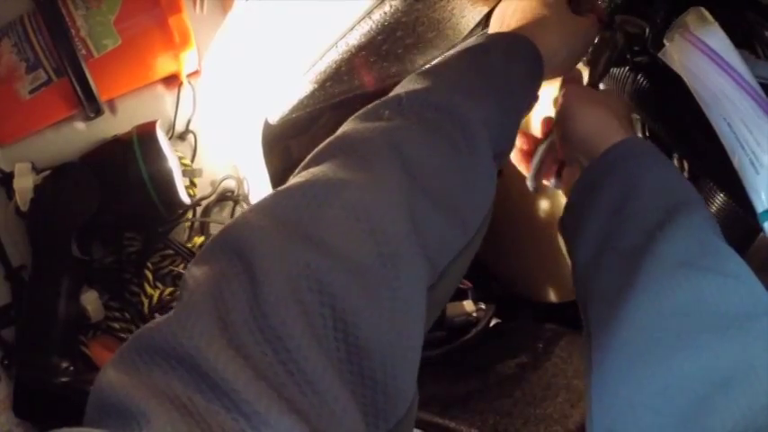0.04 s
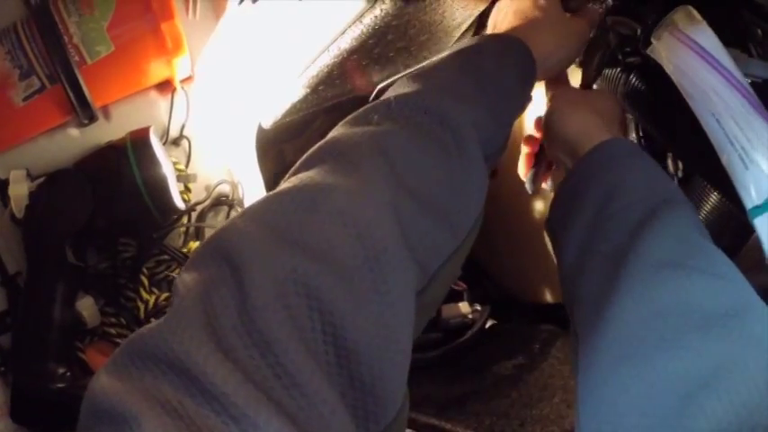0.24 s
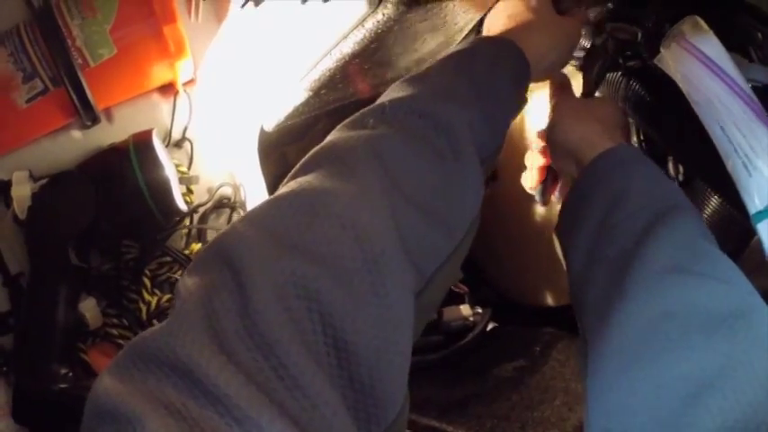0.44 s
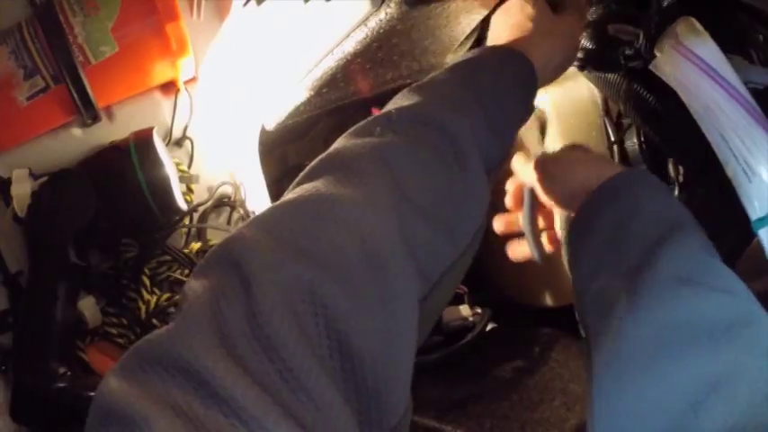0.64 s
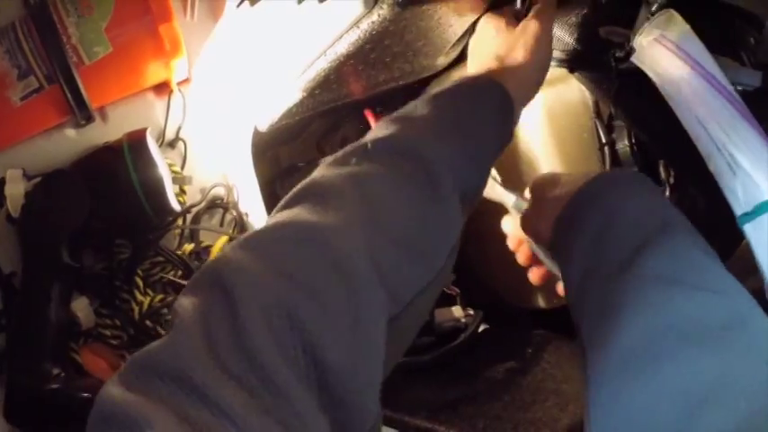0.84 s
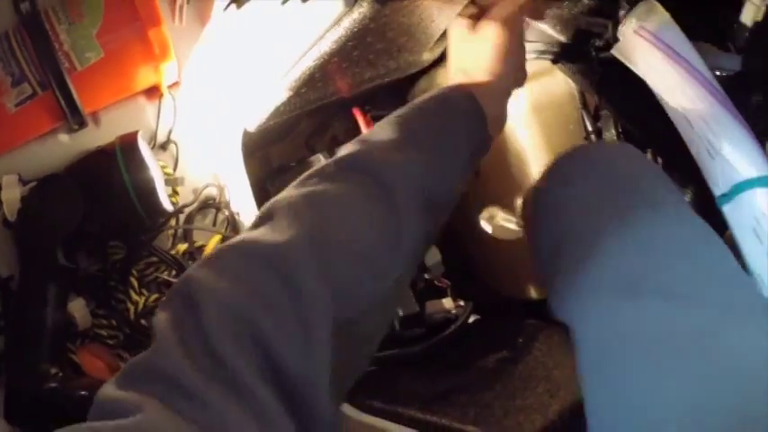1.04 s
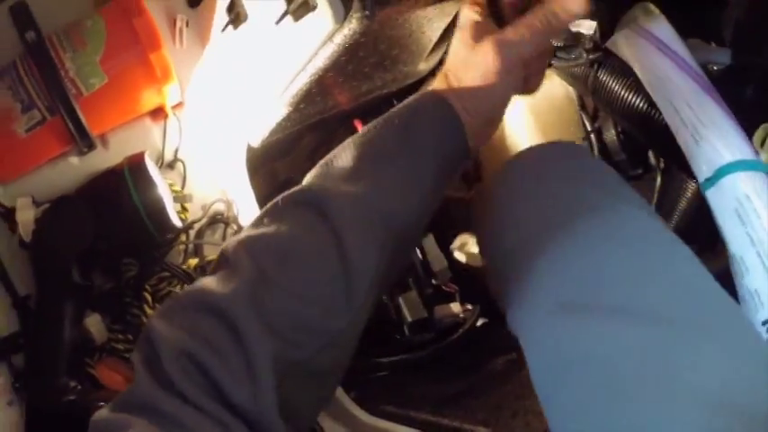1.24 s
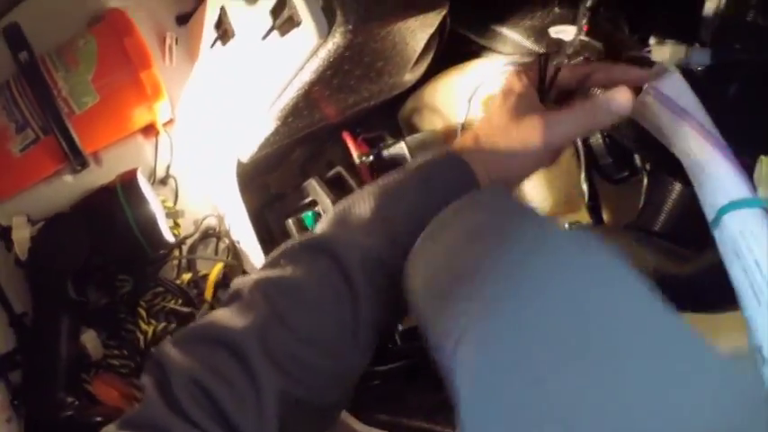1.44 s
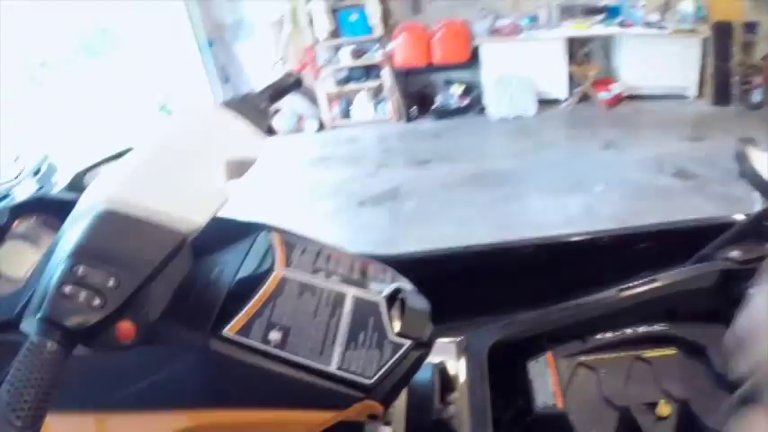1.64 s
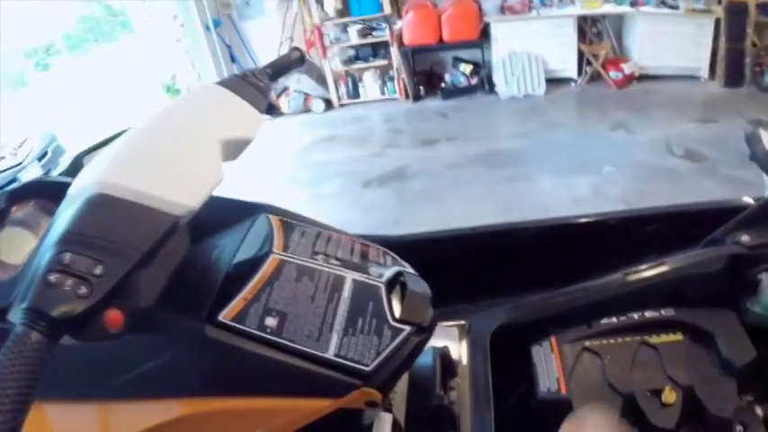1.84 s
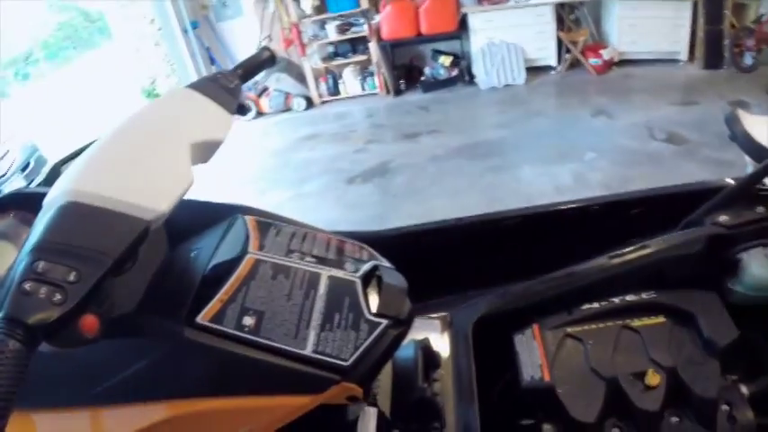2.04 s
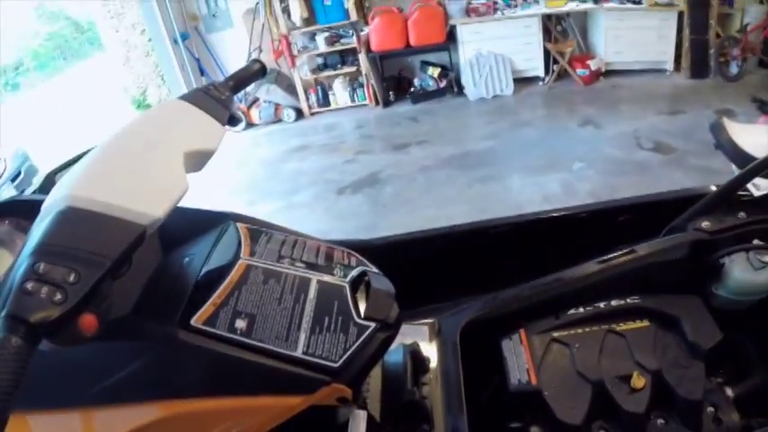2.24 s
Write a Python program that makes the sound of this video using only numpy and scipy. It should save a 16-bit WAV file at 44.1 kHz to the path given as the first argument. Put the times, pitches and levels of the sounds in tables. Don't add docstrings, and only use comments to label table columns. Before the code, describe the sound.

A single sharp snip of cutters through a plastic cable tie, over soft hiss and low rumble

```python
import sys
import numpy as np
from scipy import signal
from scipy.fft import rfft, irfft
from scipy.io import wavfile
from scipy.ndimage import uniform_filter1d

SR = 44100
rng = np.random.default_rng(int(sys.argv[2]) if len(sys.argv) > 2 else 0)


def store_pcm(level_fs):
    pcm = np.round(np.clip(level_fs, -1, 1) * 32767).astype(np.int16)
    wavfile.write(sys.argv[1], SR, np.atleast_2d(pcm).T)


def volts_from_db(level):
    exponent = np.asarray(level, float) / 20
    return 10 ** exponent


N = 101121

# (time [s], level [dB])
SNAP_EVENTS = [
    (0.4641, -10),
    (.4648, -5.5),
    (.4656, -11),
    (.4662, -12.5),
    (0.4672, -6),
    (.4689, -19),
    (.4706, -18.5),
    (.4731, -24.5),
    (.4785, -33.5),
]
# (frequency [Hz], level [dB], T60 [s])
BODY_MODES = [(1170, -10, .03), (1642, -24.5, 0.038), (2010, -8.5, .03), (2152, -13.5, .022),
              (2440, -14.5, .022), (2600, -7, 0.01), (3437, -8.5, .016), (3590, -12.5, 0.02),
              (4627, 0, 0.011), (4920, -4, 0.012), (5280, -9, 0.012), (6720, -4, 0.014), (7500, -6.5, .014),
              (8430, -6, 0.0074)]
# (frequency [Hz], density [dB per Hz])
CRACK_SPECTRUM = [(1400, -20.5), (2200, -6.5), (3000, -12), (4700, -12.5), (5800, -7.5), (7500, 1),
                  (10000, -7), (15500, -30)]
# (frequency [Hz], density [dB per Hz])
TAIL_SPECTRUM = [(1400, -13.5), (2060, -0.5), (3000, -8), (4500, -11), (6800, -4), (8500, -10.5),
                 (11000, -25), (15000, -39.5)]
# (time [s], level [dB], frequency [Hz], T60 [s])
THUMP_EVENTS = [
    (.4765, -19, 55, .14),
    (.878, -26, 55, .14),
    (1.318, -26, 55, .08),
    (1.597, -26, 30, .14),
]
# (time [s], level [dB], frequency [Hz], T60 [s])
TICK_EVENTS = [
    (.4254, -42, 4900, .025),
    (.8814, -49, 2300, .03),
    (1.058, -48, 3000, .07),
    (1.122, -46, 2800, .06),
    (1.123, -48, 5200, .05),
    (1.2476, -37, 4800, .02),
    (1.248, -40, 4200, .025),
    (1.2485, -39, 3200, .035),
    (1.252, -45, 2500, .04),
]
# (start [s], length [s], level [dB], frequency [Hz], relative width [1])
BRUSH_EVENTS = [
    (.16, .06, -59, 1400, .4),
    (1.13, .1, -54, 3450, .14),
    (1.14, .08, -58, 1800, .25),
    (1.14, .09, -58, 5200, .6),
    (1.59, .042, -51, 2800, .14),
    (1.582, .04, -55, 4600, .12),
    (1.585, .055, -56, 3600, .9),
    (1.0, .1, -71, 10500, .06),
    (1.12, .14, -71, 10500, .06),
    (1.585, .07, -71, 10500, .06),
]
# (frequency [Hz], density [dB per Hz])
HISS_SPECTRUM = [(53, -29.5), (90, -6.5), (213, -4.5), (294, -8.5), (443, -10), (515, -12.5), (2710, -18.5),
                 (13300, -39), (15500, -49.5)]
# (frequency [Hz], density [dB per Hz])
RUMBLE_SPECTRUM = [(7.1, -14), (12, 5.5), (31, -5.5), (70, -10.5), (97, -20.5), (160, -36), (210, -64),
                   (350, -120)]
# (time [s], level [dB])
GUST_LEVEL = [(0, -39), (.1, -43), (.3, -42), (.45, -43.5), (.52, -56), (.59, -42), (.74, -45.5),
              (.85, -50), (.92, -39.5), (.97, -36.5), (1.05, -40), (1.3, -36), (1.48, -38), (1.682, -37.5),
              (1.7, -48), (1.93, -48), (2.15, -46), (2.29, -51)]
# (time [s], gain [dB])
RECORDER_GAIN = [(0, 0), (.3, 0), (.46, 0.5), (.5, -5.5), (.62, -5), (.85, -3), (1.1, 0), (1.3, -0.5),
                 (1.686, 0.65), (1.698, -13.5), (1.8, -12.5), (2.0, -8.5), (2.15, -5), (2.29, -3)]


def evened(x):
    return x / np.sqrt(np.mean(x ** 2) + 1e-20)


def curve(points):
    return np.interp(np.arange(N) / SR, *np.transpose(points))


def add(mix, start_s, sound):
    part = mix[round(start_s * SR):][:len(sound)]
    part += sound[:len(part)]


def coloured(x, spectrum):
    bin_hz = np.fft.rfftfreq(len(x), 1 / SR)
    point_hz, point_db = np.transpose(spectrum)
    bin_db = np.interp(np.log(bin_hz + 1), np.log(point_hz + 1), point_db, -80, -80)
    return evened(irfft(rfft(x) * volts_from_db(bin_db), len(x)))


def banded(x, hz, width):
    b, a = signal.iirpeak(min(hz, SR / 2.2), 1 / np.clip(width, .02, 2), SR)
    once = signal.lfilter(b, a, x)
    return evened(signal.lfilter(b, a, once))


def dying(t60_s, t, rise_s=0.0001):
    return np.minimum(t / rise_s, 1) * volts_from_db(-60 * t / t60_s)


def snip():
    ring_db, crack_db, crack_t60_s, rise_turns = -5.5, -8, 0.0044, 1.4
    bay_db, bay_t60_s, garage_db, garage_t60_s = -22, 0.053, -43.5, 0.26
    low_hz, top_hz, knee = 1540, 15000, .62
    size = 9000
    t, out = np.arange(size) / SR, np.zeros(N)
    phases = rng.random((len(SNAP_EVENTS), len(BODY_MODES))) * 2 * np.pi
    noise = coloured(rng.standard_normal(N), CRACK_SPECTRUM)
    for k, (start_s, db) in enumerate(SNAP_EVENTS):
        ring = np.zeros(size)
        for (hz, mode_db, t60_s), phase in zip(BODY_MODES, phases[k]):
            envelope = volts_from_db(mode_db) * dying(t60_s, t, rise_turns / hz)
            ring += envelope * np.sin(2 * np.pi * hz * t + phase)
        crack = dying(crack_t60_s, t) * noise[k * size:][:size]
        add(out, start_s, volts_from_db(db) * (volts_from_db(ring_db) * ring + volts_from_db(crack_db) * crack))
    bay = volts_from_db(bay_db) * dying(bay_t60_s, t, 0.0012)
    garage = volts_from_db(garage_db) * dying(garage_t60_s, t, 0.014)
    tail = (bay + garage) * coloured(rng.standard_normal(size), TAIL_SPECTRUM)
    add(out, SNAP_EVENTS[0][0], tail)
    band = signal.butter(7, [low_hz, top_hz], "bandpass", fs=SR, output="sos")
    return signal.sosfilt(band, knee * np.tanh(out / knee))


def thumps():
    t, out = np.arange(9000) / SR, np.zeros(N)
    for start_s, db, hz, t60_s in THUMP_EVENTS:
        swing = np.sin(2 * np.pi * hz * (t - .004))
        add(out, start_s, volts_from_db(db) * dying(t60_s, t, .008) * swing)
    return out


def ticks():
    size, relative_width = 3000, .24
    t, out = np.arange(size) / SR, np.zeros(N)
    noises = rng.standard_normal((len(TICK_EVENTS), size))
    for (start_s, db, hz, t60_s), noise in zip(TICK_EVENTS, noises):
        burst = dying(t60_s, t, 0.0011) * banded(noise, hz, relative_width)
        add(out, start_s, volts_from_db(db) * burst)
    return out


def brushes():
    grit_per_s, grit_db = 500, 4.5
    size, out = SR // 2, np.zeros(N)
    draws = rng.random((len(BRUSH_EVENTS), 2, size))
    for (start_s, length_s, db, hz, width), (chance, strength) in zip(BRUSH_EVENTS, draws):
        hits = chance < grit_per_s / SR
        sign = np.sign(strength[::-1] - .5)
        grit = hits * volts_from_db(-grit_db * np.log(strength + 1e-3)) * sign
        progress = np.minimum(np.arange(size) / SR / length_s, 1)
        add(out, start_s, volts_from_db(db) * np.sin(np.pi * progress) * banded(grit, hz, width))
    return out


def air():
    hiss_db, patch_db, flicker_db = -49, 0.34, 0.59
    hiss = coloured(rng.standard_normal(N), HISS_SPECTRUM)
    _, t, z = signal.stft(hiss, SR, nperseg=512)
    patches = uniform_filter1d(rng.standard_normal(z.T.shape), size=8, axis=0)
    patches = evened(uniform_filter1d(patches, size=8, axis=1)).T
    flicker = evened(uniform_filter1d(rng.standard_normal(len(t)), size=3))
    z = z * volts_from_db(patch_db * patches + flicker_db * flicker)
    return volts_from_db(hiss_db) * signal.istft(z, SR, nperseg=512)[1][:N]


def rumble():
    level_db = curve(GUST_LEVEL) - curve(RECORDER_GAIN)
    return volts_from_db(level_db) * coloured(rng.standard_normal(N), RUMBLE_SPECTRUM)


def scene():
    return (snip() + thumps() + ticks() + brushes() + air() + rumble())[None]


def roll_off(x):
    return signal.sosfilt(signal.butter(12, 16180, fs=SR, output="sos"), x)


def record(dry):
    change_s, dull_hz, full_hz, loud_db = 1.69, 12700, 15250, -92
    dull_rise_hz_per_s = 900
    hz, t, z = signal.stft(dry * volts_from_db(curve(RECORDER_GAIN)), SR, nperseg=2048, noverlap=1536)
    luck = rng.random((len(t) // 3 + 1, 1025 // 8 + 1))
    luck = np.repeat(np.repeat(luck, 3, axis=0), 8, axis=1)[:len(t), :1025].T
    late_edge_hz = dull_hz + dull_rise_hz_per_s * np.maximum(t - 2, 0)
    edge_hz = np.where(t > change_s, late_edge_hz, full_hz)
    height = ((hz[:, None] - dull_hz) / (full_hz - dull_hz)).clip(0)
    keep = (luck > height ** 2.2 * .9) & (hz[:, None] < edge_hz)
    loud = uniform_filter1d(abs(z[0]), size=25, axis=0) > volts_from_db(loud_db)
    mix = signal.istft(z * (keep | loud), SR, nperseg=2048, noverlap=1536)[1][:, :N]
    return roll_off(mix)


dry = scene()
out = record(dry)
store_pcm(out)
```